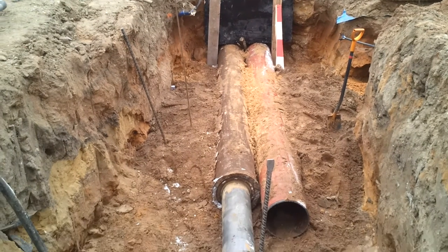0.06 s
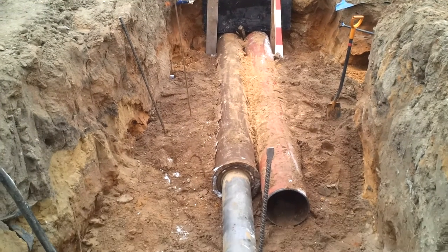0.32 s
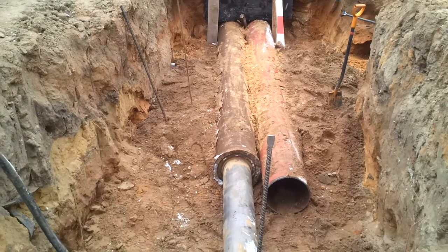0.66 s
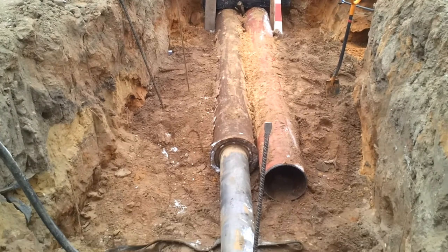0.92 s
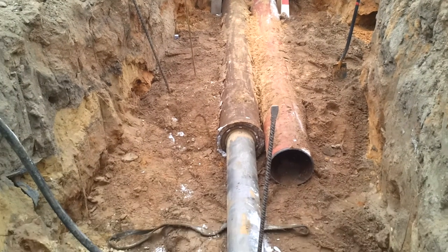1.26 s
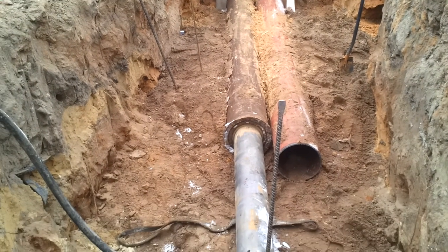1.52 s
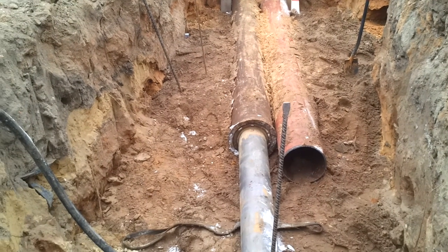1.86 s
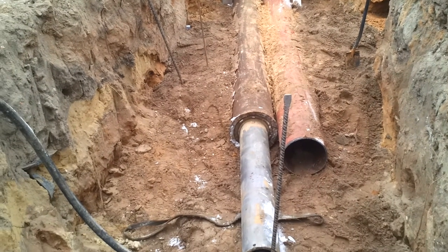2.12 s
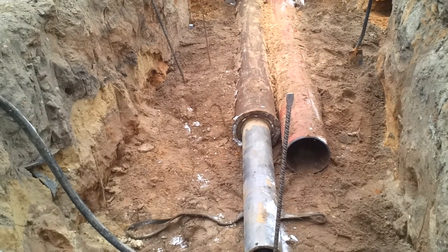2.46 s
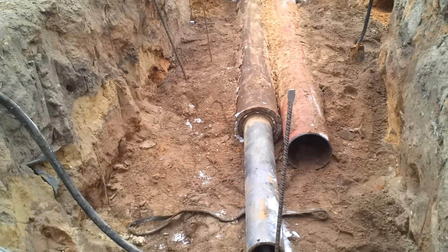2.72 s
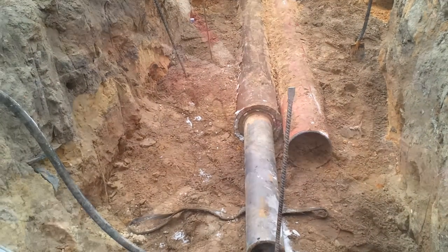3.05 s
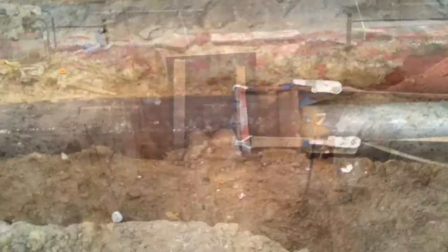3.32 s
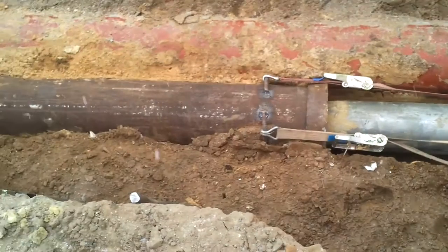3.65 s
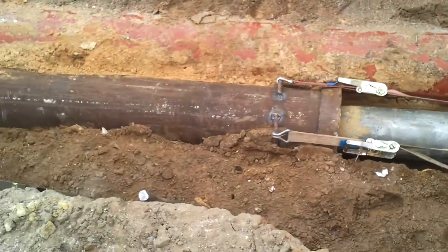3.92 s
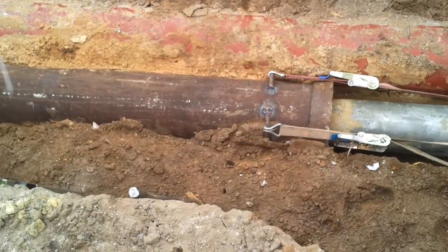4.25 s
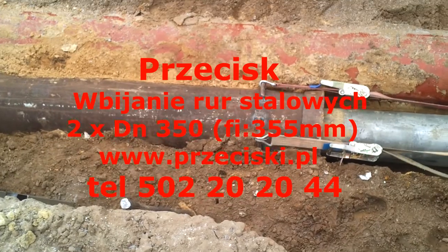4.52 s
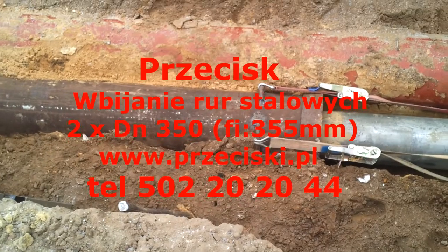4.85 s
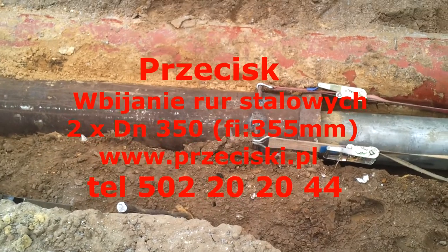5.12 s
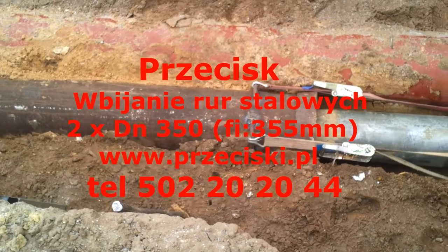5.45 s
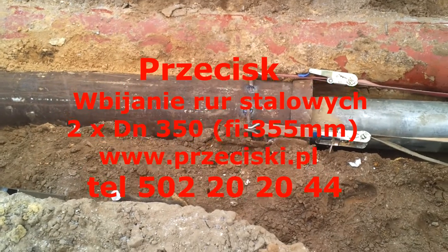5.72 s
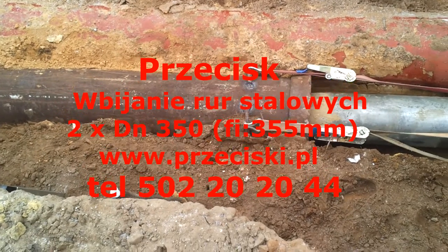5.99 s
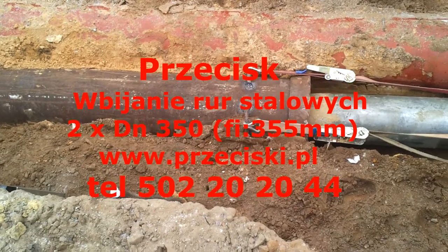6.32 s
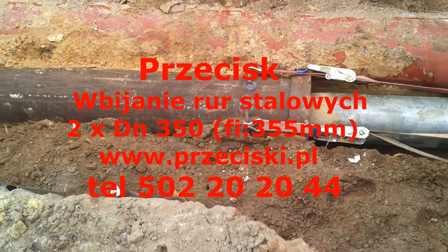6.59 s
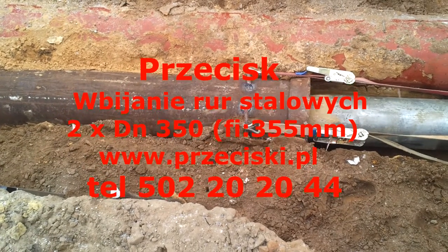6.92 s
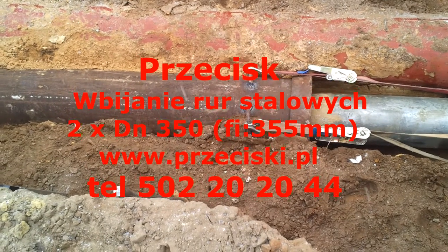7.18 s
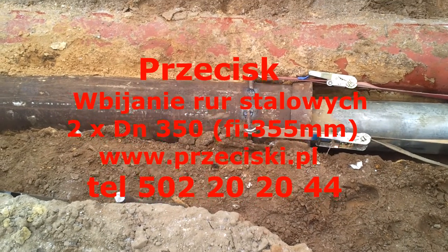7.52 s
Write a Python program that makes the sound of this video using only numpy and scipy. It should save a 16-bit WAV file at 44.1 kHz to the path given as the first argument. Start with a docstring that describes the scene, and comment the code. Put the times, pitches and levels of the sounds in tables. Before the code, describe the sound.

A pneumatic rammer pounds a steel pipe in a trench, heard up close: sharp, ringing clangs, three a second, each venting a hiss of air with a high whistle over a low engine hum. Before it starts, there are about three seconds of much quieter, distant compressor drone with thin squeaks and a single dull knock, then a split second of silence. The hammering overloads the microphone and never lets up.

```python
"""A construction trench. First a compressor drones and whines some way off, with faint squeaks and one dull
knock. After a short silence a pneumatic rammer cuts in close by, already driving a steel pipe at three blows a
second beside a humming engine. Each stroke clangs the pipe, then vents a chuff of air with a ringing whistle
and squeals; one gritty scuff falls between early blows. To the end, the clangs clip and duck everything else."""
import sys
import numpy as np
from scipy import signal
from scipy.fft import rfft, irfft, next_fast_len
from scipy.io import wavfile
from scipy.ndimage import map_coordinates

SR = 44100
rng = np.random.default_rng(int(sys.argv[2]) if len(sys.argv) > 2 else 0)


def digitize_waveform(pressure):
    """Quantize a signal to 16-bit integers and store it at the path in sys.argv[1].

    Rows of a 2-D input are taken as channels; values are limited to [-1, 1].
    """
    field = np.atleast_2d(pressure).T
    bounded = np.clip(field, -1, 1)
    quanta = np.round(bounded * 32767).astype(np.int16)
    wavfile.write(sys.argv[1], SR, quanta)


N = 333396
TIME = np.arange(N) / SR

# piston blows on the pipe: (time [s], accent [dB])
BLOWS = [(3.058, 2), (3.3645, 2), (3.6699, 1), (3.9743, 1.5), (4.2794, 2), (4.583, 2), (4.8880, 2),
         (5.1925, 2.5), (5.4964, 2.5), (5.8012, 3), (6.1079, 1.5), (6.412, 1.5), (6.7171, 3), (7.0230, 2),
         (7.3285, 1.5)]
# pipe modes: (pitch [Hz], relative level [dB], pan left [dB], left phase lead [rad])
PIPE_MODES = [(248, -10, 4, -0.2), (291, -13, -2, -0.0), (371, -11, 1, -0.3), (452, -10, 0, -0.4),
              (511, -11, 1, -0.4), (689, -10, -1, 0.8), (775, -9, 0, 0.3), (829, -8, -5, 0.5),
              (915, -15, -7, 2.1), (1012, -2, -4, 1.3), (1141, -6, -7, 0.3), (1195, -7, -3, 0.5),
              (1270, -3, 0, 0.3), (1330, -6, -1, -0.2), (1480, -7, 4, -1.8), (1615, -7, -5, -2.9),
              (1696, -10, -5, 0.7), (1739, -8, 1, 1.9), (1820, -3, 5, 1.8), (1900, -9, 0, 0.7),
              (1965, -10, 6, 1.1), (2024, -11, 4, 2.3), (2078, -14, -1, -2.0), (2116, -13, -1, 1.5),
              (2148, -11, 3, 2.8), (2250, -9, -5, 2.7), (2336, -14, -3, 1.7)]
# how well the pipe wall radiates: (frequency [Hz], gain [dB])
RADIATION = [(250, 2), (400, -1.5), (800, -2), (1150, -1.5), (1500, -0.5), (1900, -0.5), (2400, 2)]
# modes that outlast the clang: (pitch [Hz], level [dB], t60 [s])
LONG_MODES = [(1001.5, -25.5, 0.4), (1107, -50, 1), (5170, -20, 0.24)]
# peeps as the piston turns and returns: (time after blow [s], length [s], level [dB], bend [Hz])
PEEPS = [(0.071, .042, -8, -31), (0.231, .048, -16, 22)]
# overblown squeals: (time after blow [s], length [s], pitch [Hz], level [dB], pan left [dB])
SQUEALS = [(.05, .055, 6886, -12, 5), (.04, .04, 2590, -14, 3), (.056, .04, 2735, -15, 2),
           (.095, .045, 2670, -22, 2), (.055, .045, 13772, -28, 5)]
# the near engine's first six firing harmonics: (level [dB])
ENGINE_HARMONICS = [-39, -34.5, -32.5, -36.5, -50.5, -45]
# the compressor's engine tones: (pitch [Hz], level [dB])
COMPRESSOR_TONES = [(172, -56.5), (206.6, -44.5), (378, -54), (412, -52.5), (861.5, -51), (1035, -57)]
# its spells of whine: (time [s], length [s], level [dB])
WHINES = [(-.15, 0.45, -43), (0.218, .13, -38), (.3, .3, -42), (.66, .14, -44), (2.08, 0.5, -44),
          (2.5, .38, -43)]
# modes of the knock: (pitch [Hz], level [dB], t60 [s])
KNOCK_MODES = [(390, -30.5, 0.21), (623, -39.5, 0.077), (900, -45, .12), (950, -28, 0.091),
               (1115, -30, .12)]
# far squeaks: (time [s], length [s], pitch [Hz], level [dB])
SQUEAKS = [(.66, .12, 3300, -56), (1.22, .2, 4160, -54), (1.77, .16, 5950, -50)]

# tone colour of each noise layer: (frequency [Hz], relative level [dB])
CRACK_EQ = [(150, -13), (400, -2.5), (900, -7), (2000, 0), (2600, 0.5), (3600, -1.5), (6000, -6.5),
            (10000, -25), (15000, -67)]
EXHAUST_EQ = [(1000, -13), (2900, -16), (3500, -4.5), (4100, 1), (4700, -6), (5300, -5), (6400, -1.5),
              (8000, -9), (14000, -15)]
BURST_EQ = [(1000, -21), (4300, -15), (5500, -3.5), (6700, 0.5), (8200, -6), (11000, -7.5), (13500, -10),
            (14600, -17)]
LEAK_EQ = [(1000, -7), (2900, -9), (3600, -1.5), (5200, 0), (6600, 0.5), (8500, -1.5), (11000, -2.5),
           (14000, -8.5)]
ROAR_EQ = [(20, -15), (60, -8), (130, -8), (230, 12.5), (330, -2.5), (500, -2), (1000, -6.5), (1800, -13),
           (2600, -11.5), (5000, -14.5)]
DRONE_EQ = [(25, -28), (70, -24.5), (125, -16.5), (170, -7), (210, -1.5), (260, -6.5), (330, -12),
            (400, -8), (530, -6.5), (780, -11.5), (890, -8), (1150, -13.5), (2000, -14.5), (6000, -56)]
HISS_EQ = [(1500, -46), (2800, -2), (4350, -7), (6100, -4), (8400, -6.5), (10000, -10.5), (12000, -15),
           (14500, -21)]
SCUFF_EQ = [(100, -18), (250, 2), (600, -2), (1800, -10), (4000, -28)]
CLATTER_EQ = [(700, -35), (1300, -11), (2000, -5), (3000, -9.5), (7000, -43)]
TICK_EQ = [(200, -17), (1000, -1), (2500, -9), (5200, -10), (7000, -35)]

# stereo image of the noise layers: (frequency [Hz], left-right correlation [1 mono, 0 wide])
CRACK_IMAGE = [(500, 0.26), (1200, 1.0), (2500, 0.036), (8000, -0.39)]
EXHAUST_IMAGE = [(3000, -0.12), (8000, -0.24)]
BURST_IMAGE = [(3000, -0.14)]
LEAK_IMAGE = [(3000, -0.036), (12000, 0.041)]
ROAR_IMAGE = [(200, 1.0), (600, 0.67), (2000, 0.072)]
SCUFF_IMAGE = [(200, 0.67), (2000, .3)]
FAR_IMAGE = [(60, 0.68), (180, 0.92), (550, 1), (1650, 0.037), (4970, 0.075), (15000, -0.09)]

PORT_OPEN_S, PORT_CLOSE_S = 0.0152, 0.15  # the exhaust port, timed from each blow


def pipe_ring(t, level_db=2, t60=0.088, attack_cycles=2.07, travel_s=.003):
    """One ring of the pipe: low bending waves travel slower, so they lag and bloom later."""
    ring = 0
    for hz, db, pan_db, lead in PIPE_MODES:
        lag_cycles = 2 * travel_s * np.sqrt(1000 * hz)  # travel_s holds at 1 kHz
        envelope = (1 - np.exp(-(t * hz / attack_cycles) ** 2)) * decay(t, t60)
        gain = amp(level_db + db + curve(RADIATION, hz) + spread(pan_db))
        ring = ring + gain * envelope * np.sin(2 * np.pi * (hz * t - lag_cycles) + spread(lead))
    for hz, db, long_t60 in LONG_MODES:
        ring = ring + amp(db) * decay(t, long_t60) * np.sin(2 * np.pi * hz * t + spread(0.29))
    return ring


def clangs(crack_db=-2, crack_t60=0.15, attack_s=0.00068, rattle=.4, thump_lag_s=.013, thump_hz=550):
    """Steel on steel: the piston hits the same spot, so each blow gives nearly the same crack and ring."""
    t = TIME[:SR // 3]
    ring = pipe_ring(t)
    steel = noise(CRACK_EQ, CRACK_IMAGE, pan_db=0.5, ripple_db=4)  # the dense, weaker modes
    envelope = (1 - np.exp(-t / attack_s)) * amp(crack_db) * decay(t, crack_t60)
    rings, cracks = np.zeros((2, 2, N))
    for k, (start, db) in enumerate(BLOWS):
        fresh = steel[:, (k + 1) * len(t):(k + 2) * len(t)]
        crack = steel[:, :len(t)] + rattle * fresh
        add(rings, start, amp(db) * ring)
        add(cracks, start, amp(db) * crack * envelope)
    # the crack's low end travels slowly too and lands as a late thump
    low_lag = lambda hz: np.exp(-2j * np.pi * thump_lag_s * thump_hz * np.arctan(hz / thump_hz))
    return rings + filtered(cracks, low_lag)


def port(t, rise_s=0.02504, t60=0.1106):
    """The exhaust port's opening, 0 to 1, at t seconds after a blow: it snaps open, holds, then shuts."""
    return np.clip((t - PORT_OPEN_S) / rise_s, 0, 1) * decay(t - PORT_CLOSE_S, t60)


def air(t, sag_db_per_s=16.5, burst_peak_s=0.069, burst_rise_s=0.031):
    """Exhaust chuffs with one bright burst, over a leak that sags through each stroke and spits when the piston
    strikes."""
    flow = amp(-13 - sag_db_per_s * t) * port(t)  # pressure sags as the air vents
    burst_attack = np.clip(1 + (t - burst_peak_s) / burst_rise_s, 0, 1)
    gush = amp(-10) * burst_attack * decay(t - burst_peak_s, t60=.15)
    seep = amp(-22 - 14 * t) + amp(-9) * decay(t, t60=0.1)
    exhaust = flow * amp(0.6 * wobble(51)) * noise(EXHAUST_EQ, EXHAUST_IMAGE, pan_db=3.5, ripple_db=3)
    burst = gush * amp(wobble(51)) * noise(BURST_EQ, BURST_IMAGE, pan_db=3.5, ripple_db=4.5)
    leak = seep * amp(0.57 * wobble(7.5)) * noise(LEAK_EQ, LEAK_IMAGE, pan_db=5.5, ripple_db=1.3)
    return exhaust + burst + leak


def whistle(t, rest_hz=2467.6, vent_bend_hz=23.92, waver_hz=9, rasp_hz=25, flutter_hz=42.5,
            fade_db_per_s=105, choke_s=.268, choke_db_per_s=110):
    """A ringing tone near 2.5 kHz: sharp, raspy and fluttering as the air vents, then fading, with two peeps."""
    bend_hz = vent_bend_hz * port(t)
    flutter_depth = 0.74 * swell(t, 0, 0.161)
    flutter = 1 - flutter_depth * np.cos(2 * np.pi * flutter_hz * t)
    fade = amp(-16.5 - fade_db_per_s * np.maximum(t - PORT_CLOSE_S, 0))
    choke = amp(-choke_db_per_s * np.maximum(t - choke_s, 0))  # the returning piston cuts it off
    # standing waves in the trench swing the tone between the ears as its pitch moves
    swing_db = spread(-6 + 0.44 * bend_hz) + 2.5 * np.array([wobble(22), wobble(20)])
    envelope = flutter * fade * choke * amp(swing_db)
    for start, length, db, peep_bend_hz in PEEPS:
        peep = swell(t, start, length) ** 2
        envelope = envelope + amp(db) * peep
        bend_hz = bend_hz + peep_bend_hz * peep
    phase = phase_of(rest_hz + bend_hz + waver_hz * wobble(130) + rasp_hz * flutter_depth * wobble(400))
    flicker_db = .9 * wobble(5) + .6 * wobble(160)
    tone = envelope * amp(flicker_db) * np.sin(phase + spread(2.21))
    octave = amp(-34 + 2.2 * wobble(40)) * swell(t, 0.054, 0.19) * np.sin(2 * phase + spread(1.7))
    return np.sqrt(2) * (tone + octave)


def squeals(t, waver_hz=65):
    """The burst of air overblows the whistle into turbulent squeals, a little different every stroke."""
    out = 0
    for start, length, hz, db, pan_db in SQUEALS:
        phase = phase_of(hz + waver_hz * wobble(700))
        flicker_db = 2.5 * wobble(4) + 3 * wobble(300)
        envelope = amp(db + flicker_db + spread(pan_db)) * swell(t, start, length)
        out = out + envelope * np.sin(phase + spread(2.22))
    return np.sqrt(2) * out


def engine(firing_hz=62.9, roar_db=-29.5, putter_db=4, hum_pan_db=3):
    """The near engine: a hum of low firing harmonics over a dull roar that putters with each firing."""
    phase = phase_of(firing_hz + 0.14 * wobble(4))
    hum = sum(amp(db) * np.sin(k * phase + 2 * np.pi * rng.random())
              for k, db in enumerate(ENGINE_HARMONICS, 1))
    roar = unit_rms(amp(putter_db * np.cos(phase)) * noise(ROAR_EQ, ROAR_IMAGE, pan_db=-2.5))
    return np.sqrt(2) * hum * amp(spread(hum_pan_db)) + amp(roar_db + wobble(5.2)) * roar


def scuff(level_db=-27):
    """One short gritty scrape between two blows."""
    grit = noise(SCUFF_EQ, SCUFF_IMAGE)
    return amp(level_db + 2.46 * wobble(97)) * swell(TIME, start=3.82, length=0.14) * grit


def compressor(drone_db=-36, clatter_db=-45.5, hiss_db=-45, whine_hz=460.8, ease_s=1.12, ease_db=6):
    """The far machine: a drone with wavering tones, spells of whine, thin hiss and clatter that eases."""
    far = lambda eq: noise(eq, FAR_IMAGE, pan_db=1.7, lead_ms=.12, ripple_db=2.5)

    def tone(hz):
        return np.sqrt(2) * amp(1.9 * wobble(17)) * np.sin(2 * np.pi * hz * TIME + 0.76 * wobble(21.99))

    drone = amp(drone_db + 0.38 * wobble(6.34)) * far(DRONE_EQ)
    eased = np.clip((TIME - ease_s) / .25, 0, 1)
    clatter = amp(clatter_db - ease_db * eased + 0.97 * wobble(4.7)) * far(CLATTER_EQ)
    hiss = amp(hiss_db) * far(HISS_EQ)
    whine = sum(amp(db) * swell(TIME, start, length) for start, length, db in WHINES) * tone(whine_hz)
    tones = sum(amp(db) * tone(hz) for hz, db in COMPRESSOR_TONES)
    return drone + clatter + hiss + whine + tones


def knock(start=2.0543, tick_db=-30):
    """One dull, far knock: a few short modes under a noisy tick."""
    t = np.maximum(TIME - start, 0)
    ring = sum(amp(db) * decay(t, t60) * np.sin(2 * np.pi * hz * t) for hz, db, t60 in KNOCK_MODES)
    tick = (t > 0) * amp(tick_db) * decay(t, t60=0.13) * noise(TICK_EQ, FAR_IMAGE)
    return ring + tick


def squeaks(waver_hz=90):
    """Thin squeaks from somewhere on the site, roughened by a fast waver in pitch."""
    return sum(amp(db) * swell(TIME, start, length) * np.sin(phase_of(hz + waver_hz * wobble(370)))
               for start, length, hz, db in SQUEAKS)


def duck(x, threshold_db=-9, release_db_per_s=42, attack_s=0.018, detector_s=0.021):
    """Loud hits pull the gain down fast; it then creeps back up."""
    smooth = lambda v, s: signal.lfilter([1 / (s * SR)], [1, 1 / (s * SR) - 1], v)
    level_db = 10 * np.log10(smooth(np.mean(x ** 2, axis=0), detector_s) + 1e-12)
    over_db = np.maximum(level_db - threshold_db, 0)
    creep_db = release_db_per_s * TIME
    cut_db = np.maximum.accumulate(over_db + creep_db) - creep_db
    return x * amp(-smooth(cut_db, attack_s))


def noise(eq, image, pan_db=0, lead_ms=0, ripple_db=0):
    """Stereo noise of rms 1; the left may be louder and earlier, and standing waves may ripple its EQ."""
    def colour(hz):
        width = np.arccos(np.clip(curve(image, hz), -1, 1)) / 2
        ripple = ripple_db * map_coordinates(rng.standard_normal(400), [hz / 60])
        return amp(curve(eq, hz) + ripple) * [np.cos(width), np.sin(width)]

    mid, side = filtered(rng.standard_normal((2, N)), colour)
    lead = lambda hz: np.exp(2j * np.pi * hz * spread(lead_ms) / 1000)
    pair = filtered(np.array([mid + side, mid - side]), lead)
    return unit_rms(pair * amp(spread(pan_db)))


def amp(db):
    return 10 ** (np.asarray(db) / 20)


def unit_rms(x):
    return x / np.sqrt(np.mean(x ** 2) + 1e-20)


def phase_of(hz):
    return 2 * np.pi * np.cumsum(hz) / SR


def decay(t, t60):
    """Holds at 1 until t = 0, then falls 60 dB every t60 seconds."""
    return amp(-60 * np.maximum(t, 0) / t60)


def swell(t, start, length):
    """A smooth arch, silent outside its span."""
    return np.sin(np.pi * np.clip((t - start) / length, 0, 1))


def wobble(rate):
    """Smooth random modulation, rate knots a second."""
    return map_coordinates(rng.standard_normal(int(N * rate / SR) + 4), [TIME * rate])


def spread(difference):
    """Split a left-minus-right difference evenly across the channels."""
    return np.array([[.5], [-.5]]) * difference


def curve(points, hz):
    """Read a breakpoint curve on a log frequency axis."""
    freqs, values = np.transpose(points)
    return np.interp(np.log(hz + 1), np.log(freqs + 1), values)


def filtered(x, response):
    """Shape x with a frequency response."""
    size = next_fast_len(N + 8192)
    return irfft(rfft(x, size) * response(np.fft.rfftfreq(size, 1 / SR)), size)[..., :N]


def add(track, start, sound):
    """Mix a stereo sound in at start seconds."""
    part = track[:, round(start * SR):][:, :sound.shape[1]]
    part += sound[:, :part.shape[1]]


def stroke_time():
    """Seconds since the latest blow."""
    starts = np.array(BLOWS)[:, 0]
    latest = np.maximum(np.searchsorted(starts, TIME) - 1, 0)
    return np.maximum(TIME - starts[latest], 0)


def scene(far_end_s=3.089, near_start_s=3.180):
    """The site from afar, a beat of silence, then a hard cut to the rammer in mid-stroke."""
    t = stroke_time()
    near = duck(clangs() + whistle(t) + squeals(t) + air(t) + engine() + scuff())
    far = compressor() + knock() + squeaks()
    return (TIME < far_end_s) * far + (TIME > near_start_s) * near


def record(dry, ceiling=.72, hardness=8, top_hz=14650):
    """The clangs outrun the ducking and clip flat; a brick-wall low-pass trims the top."""
    clipped = dry / (1 + np.abs(dry / ceiling) ** hardness) ** (1 / hardness)
    return filtered(clipped, lambda hz: hz < top_hz)


dry = scene()
out = record(dry)
digitize_waveform(out)
```